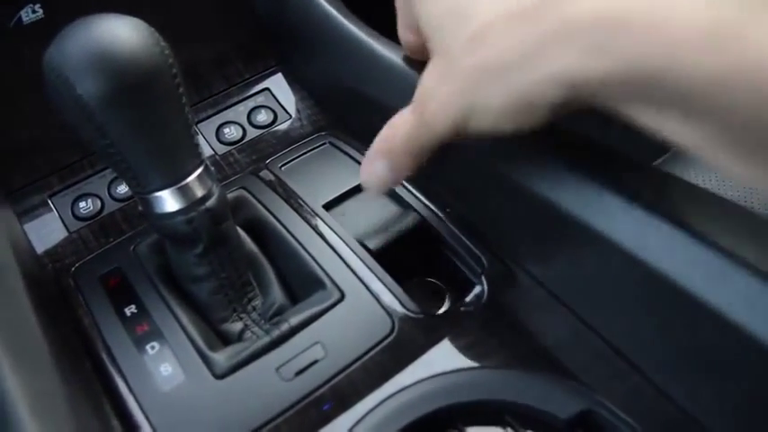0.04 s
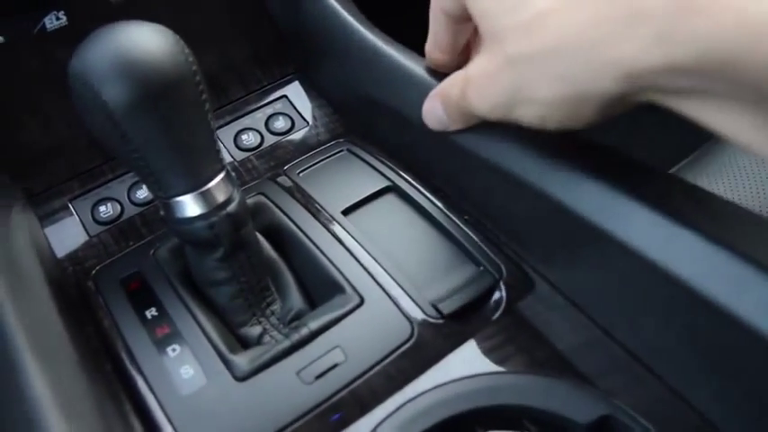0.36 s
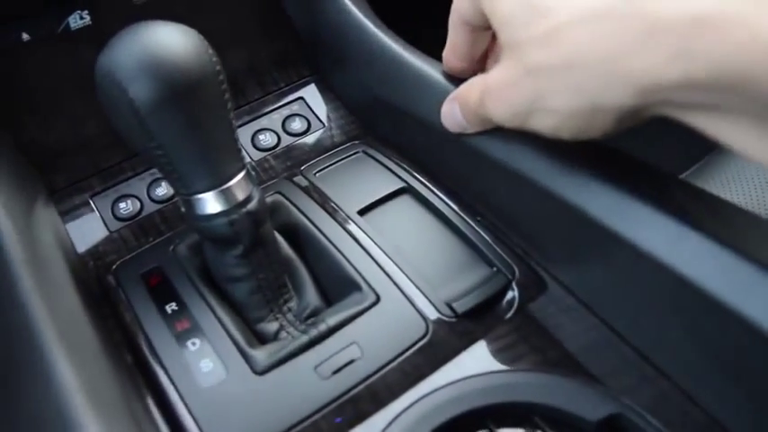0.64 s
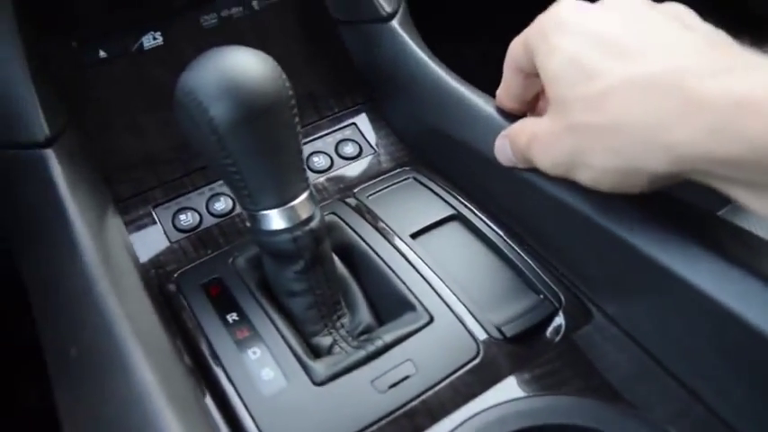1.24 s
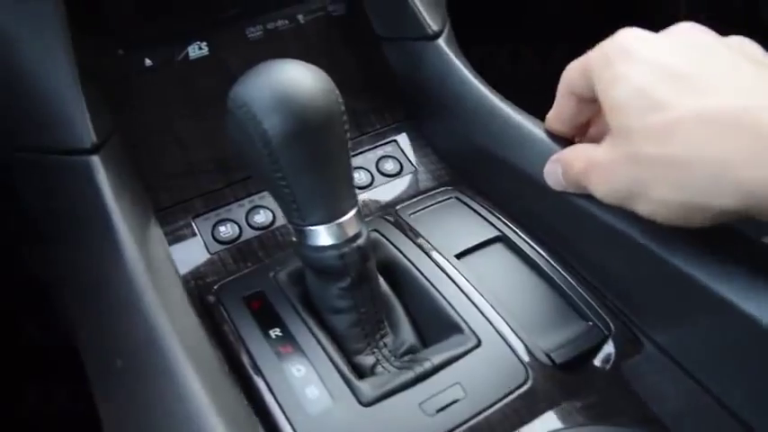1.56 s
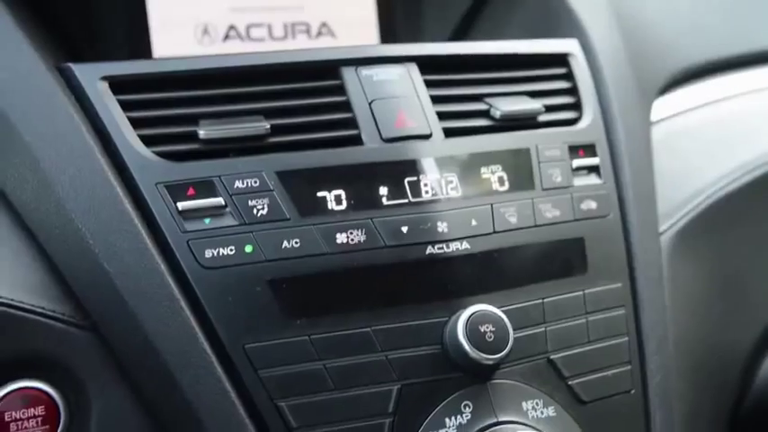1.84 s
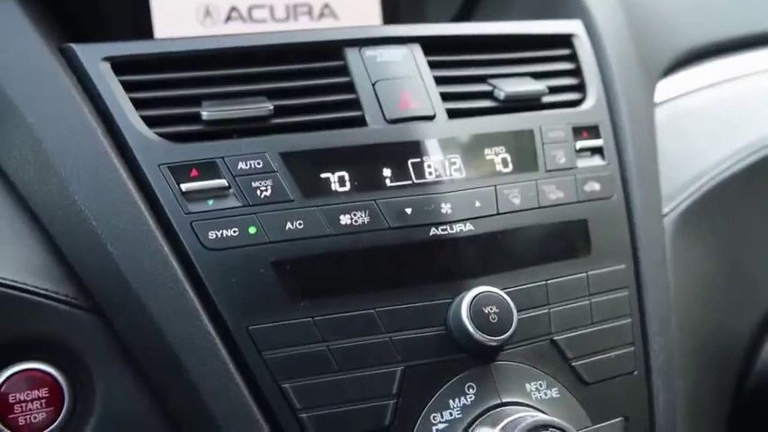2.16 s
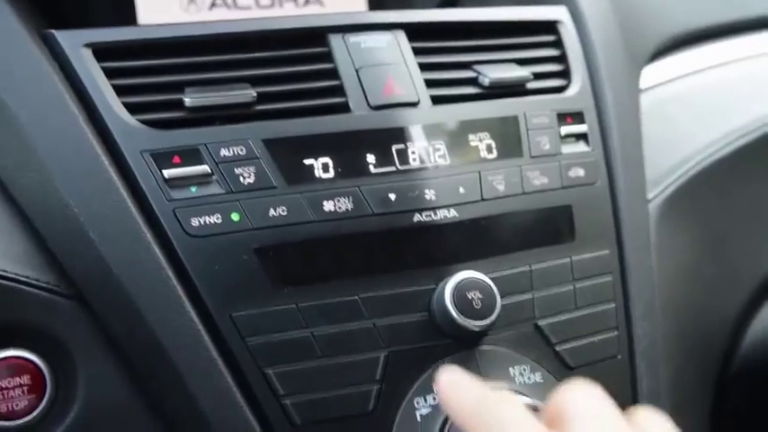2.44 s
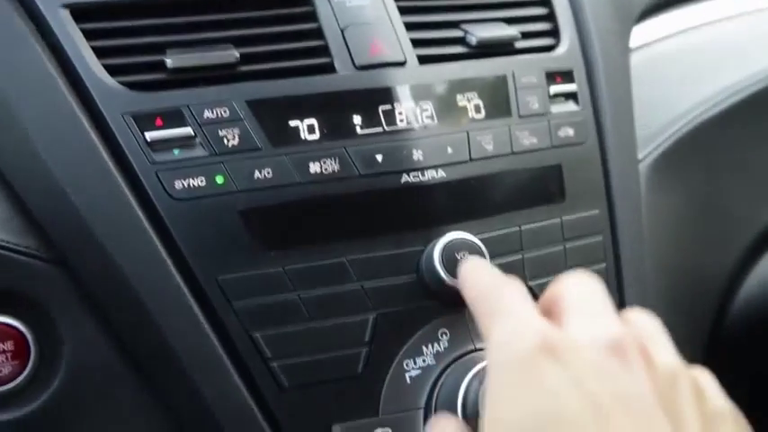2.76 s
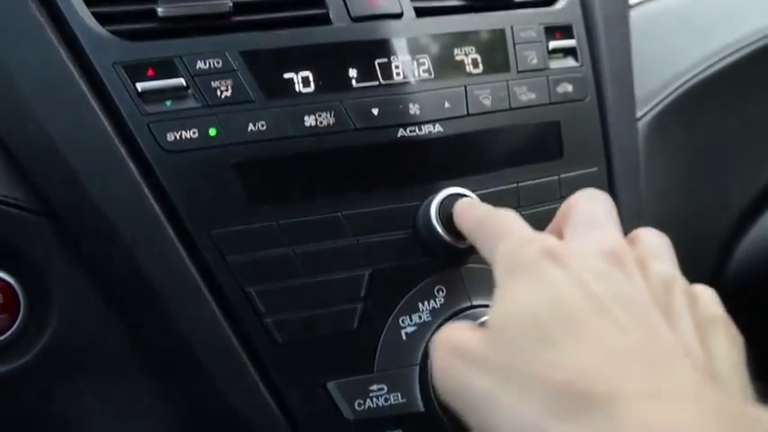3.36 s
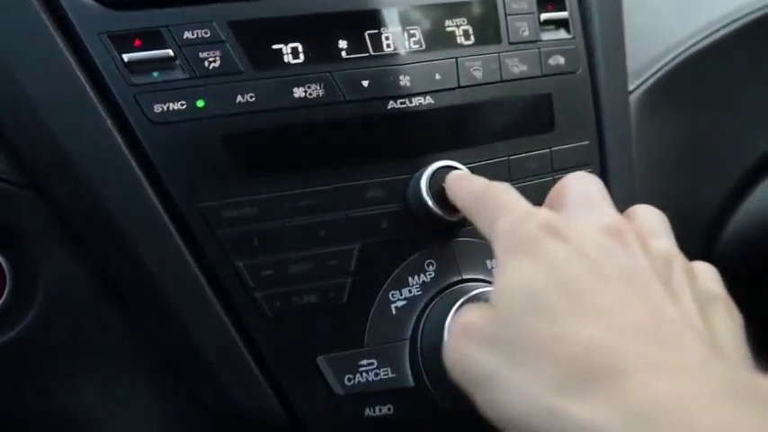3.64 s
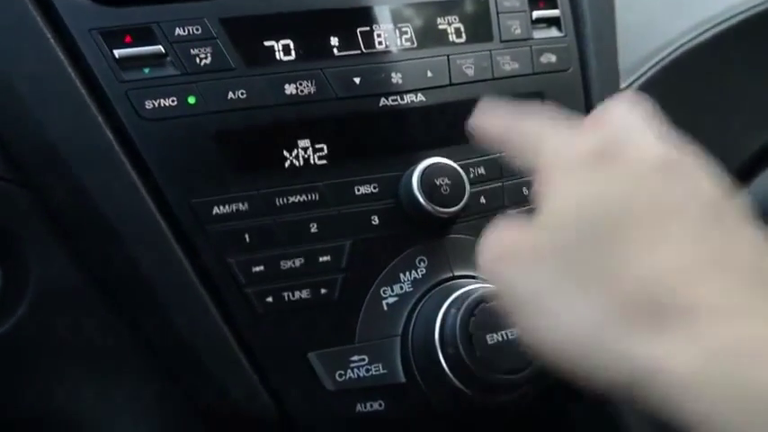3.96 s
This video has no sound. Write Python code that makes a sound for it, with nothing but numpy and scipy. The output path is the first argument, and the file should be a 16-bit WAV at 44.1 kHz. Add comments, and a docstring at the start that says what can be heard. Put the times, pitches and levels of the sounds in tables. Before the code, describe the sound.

A sliding plastic cover rattles and snaps closed, heard up close inside a car. A light tap follows, then only low idling rumble and faint air hiss, until a finger presses a dashboard knob with a soft click.

```python
"""A car idles throughout: the engine throbs under a low rumble and a faint ventilation hiss.
First a thumb pushes the console's plastic cover: it knocks free, rattles along its rails, clacks shut
and settles as the hand lands on the trim. Then the arm rustles up and reaches forward, and near the end
a finger presses a dashboard knob. The padded cabin swallows each of these sounds quickly."""
import sys
import numpy as np
from scipy import signal
from scipy.fft import rfft, irfft
from scipy.io import wavfile
from scipy.ndimage import uniform_filter1d

SR = 44100
rng = np.random.default_rng(int(sys.argv[2]) if len(sys.argv) > 2 else 0)


def generate_wav(sig):
    """Save sig (samples, or channels by samples) to the path in sys.argv[1] as 16-bit PCM at SR."""
    pcm = np.round(np.clip(np.atleast_2d(sig).T, -1, 1) * 32767).astype(np.int16)
    wavfile.write(sys.argv[1], SR, pcm)


N = 176400
T = np.arange(N) / SR


def amp(db):
    """Turn decibels into a factor to multiply by."""
    return 10 ** (np.asarray(db) / 20)


def curve(rows, column=1):
    """Join one column of a table by straight lines over time."""
    rows = np.array(rows, float)
    return np.interp(T, rows[:, 0], rows[:, column])


def colour(x, tone):
    """Make some frequencies stronger and others weaker; white noise keeps its overall power."""
    hz, db = np.array(tone, float).T
    log_hz = np.log(np.fft.rfftfreq(N, 1 / SR) + 1)
    gain = amp(np.interp(log_hz, np.log(hz), db))
    return irfft(rfft(x) * gain / np.sqrt(np.mean(gain ** 2)), N)


def noise(tone):
    """Steady noise with the given tone."""
    return colour(rng.standard_normal(N), tone)


def keep_side(x, hz, side, order=2):
    """Keep the "low" or "high" side of a frequency; a higher order cuts more sharply."""
    return signal.sosfilt(signal.butter(order, hz, side, fs=SR, output="sos"), x)


def keep_band(x, low_hz, high_hz):
    """Keep what lies between two frequencies."""
    return keep_side(keep_side(x, low_hz, "high"), high_hz, "low", order=4)


def delay(x, start_s):
    """Make a sound start later."""
    return np.concatenate([np.zeros(int(start_s * SR)), x])[:N]


def fade(fade_s):
    """Die away by 60 dB in the given time."""
    return np.exp(-np.log(1000) * T / fade_s)


def drift(rate_hz):
    """Smooth random wandering with a typical size of 1."""
    slow = keep_side(rng.standard_normal(N), rate_hz, "low")
    return slow / slow.std()


def lean_right(x, db):
    """Send a sound to both ears, the right one louder by db."""
    return x * amp(np.array([[-db], [db]]) / 2)


def burst(decay_s):
    """The brief noise of two surfaces meeting."""
    return rng.standard_normal(N) * np.exp(-T / decay_s)


def plastic_ring(notes):
    """Struck plastic rings with several notes at once, each dying quickly."""
    return sum(amp(db) * np.sin(2 * np.pi * hz * T) * fade(fade_s) for hz, db, fade_s in notes)


def rub(strokes, tone, ramp_s, grain, clicks_per_s=1600):
    """A sliding surface sticks and slips in tiny clicks; grain is their strength against a smooth hiss."""
    slips = rng.random(N) < clicks_per_s / SR
    clicks = slips * rng.standard_normal(N) * np.sqrt(SR / clicks_per_s)
    friction = (grain * clicks + rng.standard_normal(N)) / np.hypot(grain, 1)
    contact = sum(amp(db) * np.clip(np.minimum(T - start, end - T) / ramp_s, 0, 1)
                  for start, end, db in strokes)
    return colour(friction, tone) * contact


def air():
    """Steady cabin noise and ventilation hiss, with a low rumble that swells after a second."""
    # Each row: frequency in Hz, relative level in dB. The side tones make the two ears differ.
    air_tone = [(15, 5), (28, -8.5), (50, 4), (90, -14), (125, -3), (160, -23.5), (220, -12.5),
                (280, -18.5), (317, -11), (390, -19), (540, -20.5), (880, -26), (1050, -24.5), (1350, -32),
                (2000, -37), (3000, -43), (6000, -45.5), (11000, -46), (16000, -47.5)]
    air_side_tone = [(15, -10), (50, 13), (120, -10), (200, -5), (330, -5.5), (500, -8), (1000, -10),
                     (1500, -20.5), (3000, -27.5), (6000, -32.5), (16000, -33.5)]
    rumble_tone = [(60, -9), (120, 4), (155, 2.5), (205, 0.5), (270, -13.5), (400, -26.5), (800, -35.5),
                   (2000, -35), (5000, -44), (16000, -54)]
    rumble_side_tone = [(60, -19), (130, -21), (200, 1), (300, 2), (500, -20), (1000, -19), (3000, -27),
                        (16000, -45)]
    # The rumble's rise and fall. Each row: time in seconds, level in dB.
    rumble_levels = [(0, -48), (1.1, -52), (1.22, -41.5), (1.36, -50), (1.55, -44), (2.05, -42),
                     (2.35, -44), (2.85, -42.5), (3.2, -45.5), (3.5, -43.5), (4, -46)]
    swell = amp(curve(rumble_levels))
    middle = amp(-41) * noise(air_tone) + swell * noise(rumble_tone)
    side = amp(-48) * noise(air_side_tone) + amp(-11) * swell * noise(rumble_side_tone)
    return lean_right(middle, db=0.6) + np.array([side, -side])


def engine():
    """The idling engine fires in a deep, uneven throb, with overtones at two and three times its rate."""
    # Each row: time in seconds, firings per second.
    firing_rates = [(0, 36), (.6, 36), (1.2, 35.8), (1.6, 36.5), (2.0, 36.3), (2.6, 35.6), (3.2, 35.6),
                    (4, 36)]
    # Each row: time in seconds, then the levels in dB of the deep note and its two overtones.
    throb_levels = [(0, -36, -38, -47), (.3, -34, -57.5, -50.5), (.72, -35, -42, -50.5),
                    (.82, -39.5, -51, -46), (.95, -36, -48, -58), (1.09, -28, -35, -38.5),
                    (1.27, -29.5, -44, -64), (1.39, -35, -37, -37.5), (1.58, -30, -35, -64),
                    (1.76, -33, -42.5, -54), (1.88, -39, -43.5, -43), (2.12, -29, -43, -46),
                    (2.26, -38, -49.5, -47.5), (2.42, -36.5, -51, -45.5), (2.9, -35.5, -53, -47.5),
                    (3.3, -34.5, -42.5, -43.5), (3.6, -36.5, -51, -52.5), (4, -34, -59, -41)]
    phase = 2 * np.pi * (np.cumsum(curve(firing_rates)) / SR + rng.random())
    throb = 0
    for multiple in (1, 2, 3):
        wobble_db = 0.65 * multiple * drift(rate_hz=13)
        level = amp(curve(throb_levels, column=multiple) + wobble_db)
        throb += level * np.sqrt(2) * np.sin(multiple * phase + 2 * np.pi * rng.random())
    return lean_right(throb, db=1.6)


def echoes(fade_s, even_hz=160):
    """A crowd of fading echoes, evened out so that no band of width even_hz stands out."""
    spectrum = rfft(rng.standard_normal(N) * fade(fade_s))
    power = uniform_filter1d(np.abs(spectrum) ** 2, int(even_hz * N / SR))
    return irfft(spectrum / np.sqrt(power), N) * (T < 2 * fade_s)


def cabin(x, split_hz=3160, echo_gap_s=0.002):
    """Each ear hears the sound directly, then its own short echoes from glass and trim."""
    ears = []
    for lag_s in (0.00007, 0):  # the direct sound reaches the left a little later
        low = amp(-2) * keep_side(echoes(fade_s=0.057), split_hz, "low", order=4)
        high = amp(2) * keep_side(echoes(fade_s=0.068), split_hz, "high", order=4)
        reflected = signal.fftconvolve(x, delay(low + high, echo_gap_s))[:N]
        ears.append(delay(x, lag_s) + reflected)
    return np.array(ears)


def arm():
    """The arm rustles softly as it swings up, then reaches for the dashboard."""
    # Each row: start in seconds, end in seconds, level in dB.
    swings = [(.95, 2.3, -58)]
    reaches = [(2.44, 3.32, -63.5)]
    # Each row: frequency in Hz, relative level in dB.
    swing_tone = [(150, -21), (330, 15), (450, 11.5), (700, 4.5), (1200, -2), (2000, -11), (4000, -14),
                  (8000, -30), (16000, -24)]
    reach_tone = [(500, -12), (1200, -16), (1600, 6), (1950, 1.5), (2350, 3), (3000, -5), (3900, -6),
                  (5500, -13), (16000, -23)]
    swing = rub(swings, swing_tone, ramp_s=0.3, grain=0.24)
    return swing + rub(reaches, reach_tone, ramp_s=0.2, grain=0.4)


def finger_taps():
    """Hand and fingers land on the trim and knob in small taps that do not ring."""
    # Each row: start in seconds, level in dB, low and high cut-off in Hz.
    taps = [(0.4202, -41, 500, 2000), (0.429, -29.5, 400, 3870), (1.818, -46.5, 1500, 9000),
            (3.592, -50, 5000, 13000), (3.622, -48, 7000, 12800), (3.932, -51, 1500, 12000)]
    return sum(amp(db) * delay(keep_band(burst(decay_s=0.0023), low_hz, high_hz), start)
               for start, db, low_hz, high_hz in taps)


def hand_brush():
    """Skin brushes over the trim."""
    # Each row: start in seconds, end in seconds, level in dB.
    strokes = [(.22, .43, -60), (3.34, 3.46, -64), (3.50, 3.61, -61)]
    # Each row: frequency in Hz, relative level in dB.
    skin_tone = [(300, -23), (1000, 11), (2050, 4), (2420, 8), (2800, -4), (4500, -2), (7000, -9),
                 (16000, -18)]
    return rub(strokes, skin_tone, ramp_s=0.0099, grain=1.0)


def knob():
    """The pressed knob clicks softly twice: once going down, once hitting its stop."""
    # The knob's ring. Each row: pitch in Hz, level in dB, fade time in seconds.
    notes = [(667, -3, 0.038), (845, 3.5, 0.0094), (1280, -2, 0.013), (1700, -4, 0.0079),
             (3780, -12.5, .015)]
    # Each row: start in seconds, level in dB.
    clicks = [(3.4273, -40.5), (3.4369, -45)]
    ring = plastic_ring(notes)
    return sum(amp(db) * delay(ring, start) for start, db in clicks)


def cover_slide():
    """The cover scrapes along its rails."""
    # Each row: start in seconds, end in seconds, level in dB.
    slides = [(0, .023, -53.5), (.126, .174, -47)]
    # Each row: frequency in Hz, relative level in dB.
    rail_tone = [(300, 2), (1000, 11.5), (1700, 0), (2400, 15), (3000, 2), (4700, -3), (6000, -4),
                 (10500, -10), (16000, -22)]
    return rub(slides, rail_tone, ramp_s=0.0014, grain=2.4)


def cover_knocks(rise_s=0.00045):
    """Each knock makes a short crack and rings the same plastic, duller when the thumb cushions it."""
    # The ring of cover and console. Each row: pitch in Hz, level in dB, fade time in seconds.
    notes = [(298, -17.5, 0.021), (496, -16.5, 0.035), (817, -18.5, 0.042), (1024, -15.5, 0.05),
             (1150, -3.5, 0.011), (1710, -35, 0.026), (1720, -25, 0.025), (1758, 3, 0.0056),
             (2000, -5.5, 0.012), (2397, -17.5, 0.045), (2425, -23, 0.034), (3970, -18.5, .012),
             (4480, -17, 0.021), (4830, -12, 0.017)]
    # Each row: start in seconds, ring level in dB, its low and high cut-off in Hz, crack level in dB.
    knocks = [(0.0095, -34, 800, 2500, -50), (0.0223, -13, 150, 1630, -38), (0.0247, -33, 150, 1170, -40.5),
              (0.118, -30, 2200, 5500, -46), (0.1342, -29, 1300, 2670, -44),
              (.1440, -26, 3620, 8000, -34.5), (0.1465, -22, 5000, 6040, -53),
              (0.1648, -30, 600, 2500, -47), (0.1729, -11, 670, 3140, -30.5),
              (0.1838, -23.5, 1000, 5060, -50), (0.4264, -28.5, 3320, 4700, -49)]
    # Each row: frequency in Hz, relative level in dB.
    crack_tone = [(500, -3), (2300, -1), (3000, 1), (3900, 14), (4750, 9.5), (5600, 6.5), (7000, 3.5),
                  (8200, 1), (10200, 3), (13000, -6), (16000, -12)]
    rise = np.minimum(T / rise_s, 1) ** 2
    ring = rise * plastic_ring(notes)
    body, cracks = 0, 0
    for start, ring_db, low_hz, high_hz, crack_db in knocks:
        body += amp(ring_db) * delay(keep_band(ring, low_hz, high_hz), start)
        cracks += amp(crack_db) * delay(rise * burst(decay_s=0.0017), start)
    return body + colour(cracks, crack_tone)


def scene():
    """Cover, hand and knob echo in the cabin, over the engine and the air."""
    handling = cover_knocks() + cover_slide() + finger_taps() + arm() + hand_brush() + knob()
    return cabin(handling) + engine() + air()


def record(dry, whine_hz=15730, top_hz=15800):
    """Add a thin electronic whine and cut off the very highest treble."""
    whine = amp(-80) * np.sqrt(2) * np.sin(2 * np.pi * whine_hz * T)
    treble_cut = signal.ellip(12, 0.1, 80, top_hz, fs=SR, output="sos")
    return signal.sosfilt(treble_cut, dry + whine)


dry = scene()
out = record(dry)
generate_wav(out)
```